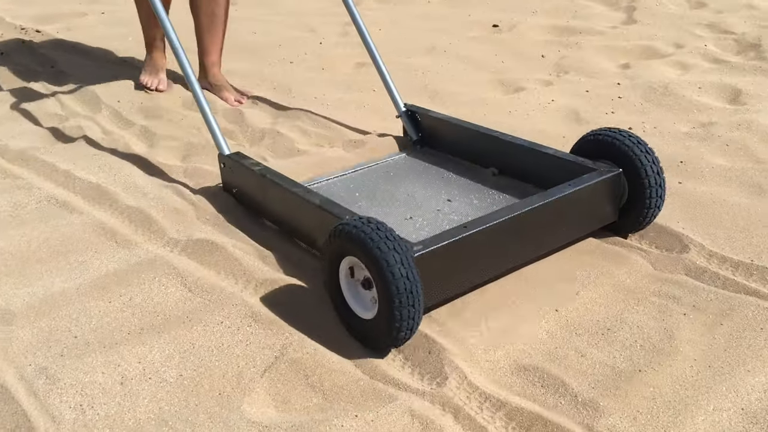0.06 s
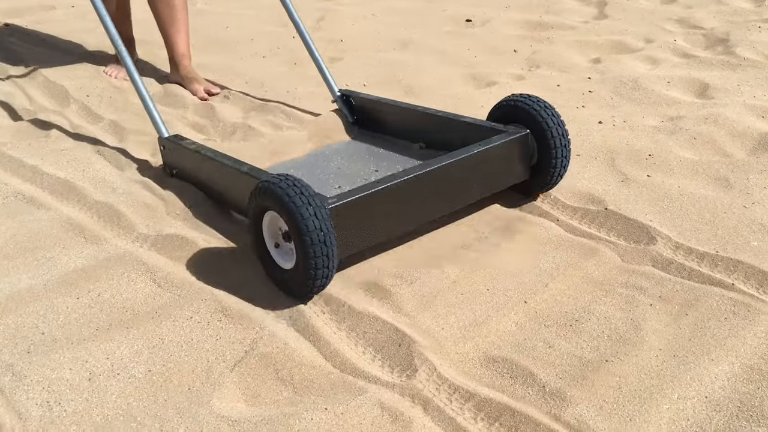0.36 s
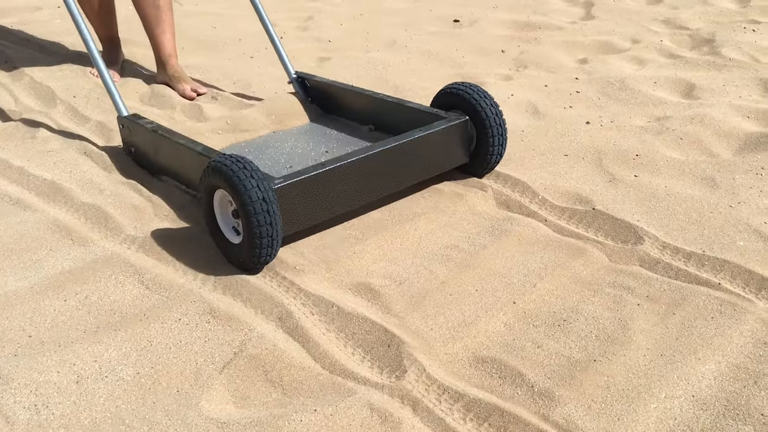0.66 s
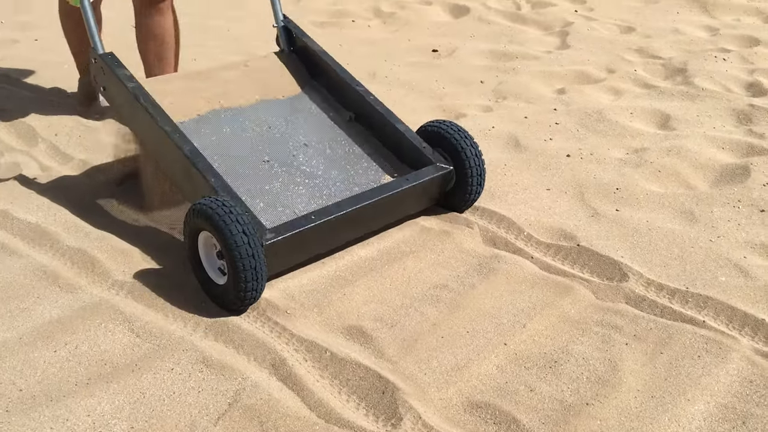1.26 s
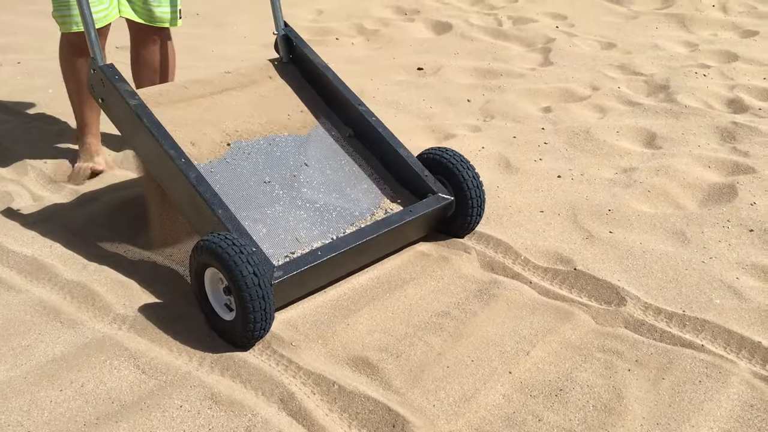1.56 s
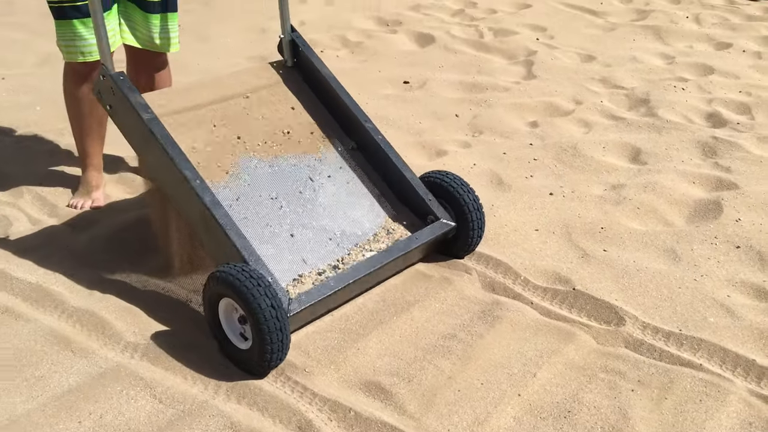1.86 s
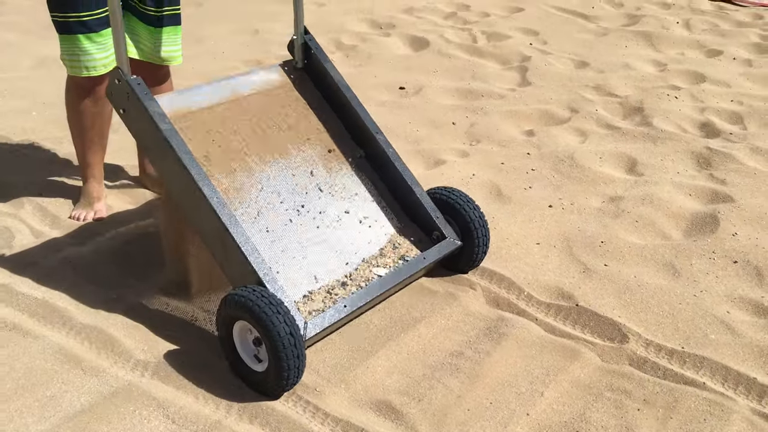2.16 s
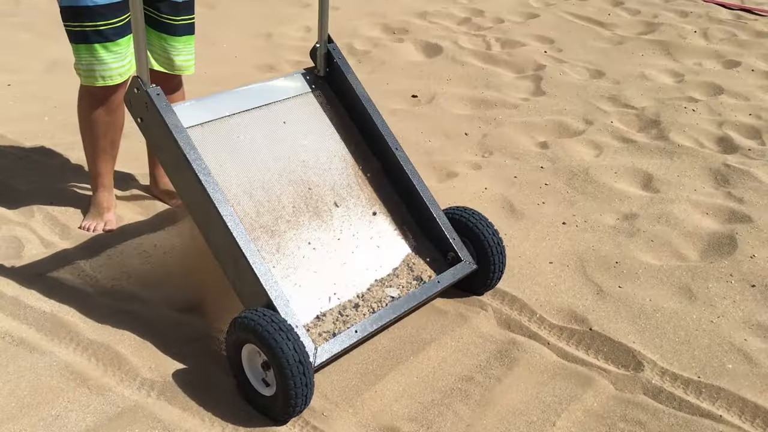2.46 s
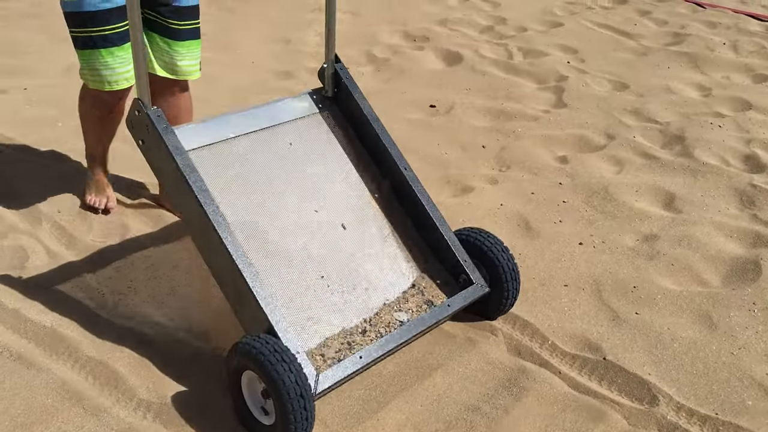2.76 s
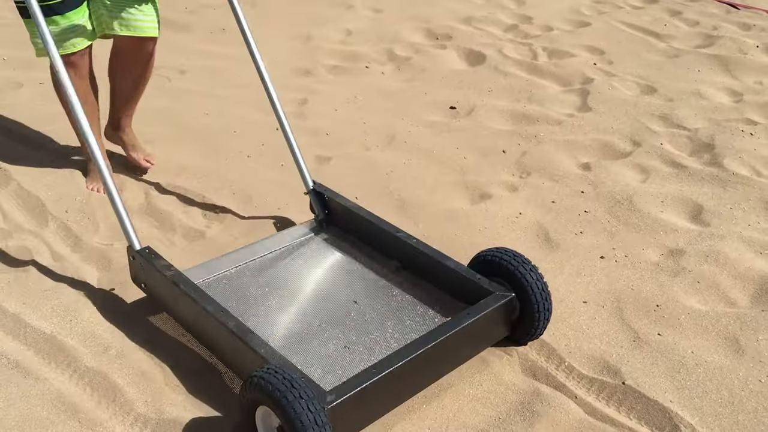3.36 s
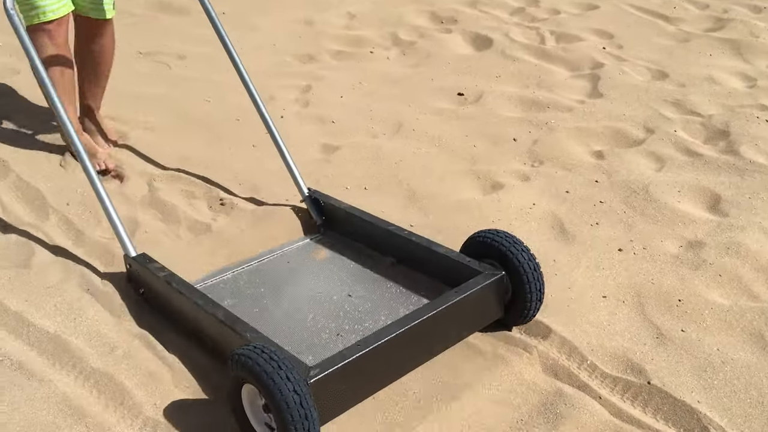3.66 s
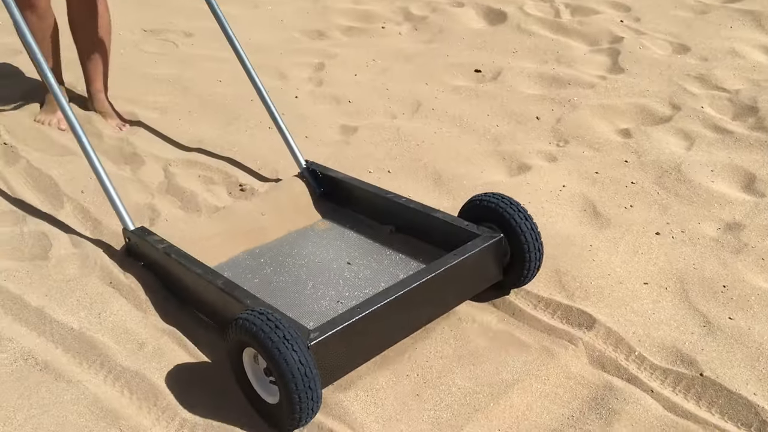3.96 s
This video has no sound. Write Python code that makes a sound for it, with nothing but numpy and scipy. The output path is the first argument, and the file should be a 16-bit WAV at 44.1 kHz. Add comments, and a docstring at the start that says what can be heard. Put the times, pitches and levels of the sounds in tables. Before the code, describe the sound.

A metal sieve scrapes through sand and tips, sifting sand and rattling pebbles, with wind behind.

```python
"""A wheeled metal sieve is dragged through beach sand, tipped up and set down again. Wind, far surf and a low
drone lie behind it all. First sand hisses under the scoop and the handle clacks; the blade crunches and a dull
low thump sounds. From about 1.1 s sand sifts through the tilted mesh, and soon pebbles tick down it. Near 3 s a
far wave breaks; then more low thumps sound, the handle clacks again and the blade crunches back in."""
import sys
import numpy as np
from scipy import signal
from scipy.fft import rfft, irfft
from scipy.io import wavfile

SR = 44100
rng = np.random.default_rng(int(sys.argv[2]) if len(sys.argv) > 2 else 0)


def dump(signal):
    """Clip the signal to [-1, 1] and save it as 16-bit WAV at the path in sys.argv[1]."""
    limited = np.clip(np.atleast_2d(signal).T, -1, 1)
    pcm = np.round(limited * 32767).astype(np.int16)
    wavfile.write(sys.argv[1], SR, pcm)


N = 176400
T, HZ = np.arange(N) / SR, np.fft.rfftfreq(N, 1 / SR)
SAND_PER_S = 9000  # grain impacts each second


def amp(db):
    """Turns decibels into a gain; amp(-60 * t / t60) fades by 60 dB in t60 seconds."""
    return 10 ** (np.asarray(db) / 20)


def unit(x):
    """Scales a signal to an average (rms) strength of 1."""
    return x / np.sqrt(np.mean(x ** 2) + 1e-20)


def level(points, column=1):
    """Turns a loudness curve into a gain for every sample."""
    rows = np.array(points)
    return amp(np.interp(T, rows[:, 0], rows[:, column]))


def tone_db(points, hz=HZ):
    """Joins the points of a tone curve, giving dB at every frequency."""
    freqs, db = np.transpose(points)
    return np.interp(np.log(hz + 1), np.log(freqs + 1), db)


def colour(x, db):
    """Makes each frequency louder or softer by the given dB."""
    cepstrum = irfft(np.maximum(db, -100) * np.log(10) / 20)
    half = len(cepstrum) // 2
    # folding onto the first half makes the filter ring after a hit, not before
    cepstrum[1:half] *= 2
    cepstrum[half + 1:] = 0
    return irfft(rfft(x) * np.exp(rfft(cepstrum)))


def add(mix, start_s, sound):
    """Places a sound at a time."""
    part = mix[max(round(start_s * SR), 0):][:len(sound)]
    part += sound[:len(part)]


def drift(rate_hz):
    """A slow random wobble of strength 1."""
    slow_only = (HZ > 0) / (1 + (HZ / rate_hz) ** 4)
    return unit(irfft(rfft(rng.standard_normal(N)) * slow_only, N))


def grains(per_s, spread_db, size=N):
    """Tiny random impacts of uneven strength."""
    strength = amp(spread_db * np.minimum(rng.exponential(1, size), 4))
    return unit(strength * rng.choice([-1, 1], size) * (rng.random(size) < per_s / SR))


def mesh_db(hz):
    """How strongly the mesh answers at each frequency."""
    # overall tone of the mesh (frequency [Hz], level [dB])
    tone = [(200, -18), (700, -2.5), (1300, 0), (2100, 1), (2700, -1.5), (3400, 3), (4900, 1), (5900, 5),
            (6600, 2), (7200, -3), (8600, 0.5), (9900, -2.5), (10500, -4.5), (11200, -6), (13000, -7)]
    # where the mesh rings (frequency [Hz], width [Hz], boost [dB])
    peaks = [(1636, 77, 8), (2940, 150, 1.5), (9400, 200, 3.5), (10000, 120, 4), (11150, 230, 7.5),
             (11830, 330, 7)]
    return tone_db(tone, hz) + sum(db / (1 + (2 * (hz - f) / width) ** 2) for f, width, db in peaks)


def shape_hit(hit, bands_db, ping_hz, ping_db, ping_width_hz):
    """Gives a hit its ping and its strength in the low, middle and high band."""
    # the three bands (lower edge [Hz], upper edge [Hz])
    edges = [(1000, 3000), (3000, 8000), (8000, 16000)]
    # where each band's gain is set (frequency [Hz])
    centres = [1700, 5000, 11000]
    hz = np.fft.rfftfreq(len(hit), 1 / SR)
    hit = colour(hit, ping_db / (1 + (2 * (hz - ping_hz) / ping_width_hz) ** 2))
    power = abs(rfft(hit)) ** 2 * 2 / len(hit) / (.02 * SR)  # energy spread over 20 ms
    now_db = [10 * np.log10(power[(hz > lo) & (hz < hi)].sum()) for lo, hi in edges]
    change = list(zip(centres, np.array(bands_db) - now_db))
    return colour(hit, tone_db(change, hz))


def wind():
    """Wind rumbles in uneven gusts."""
    # wind strength (time [s], level [dB])
    loudness = [(0.0, -46), (0.63, -43), (0.67, -39.5), (0.96, -39), (0.99, -48), (1.26, -38), (1.35, -57),
                (1.46, -38), (1.98, -41.5), (2.03, -50), (2.18, -42), (2.26, -52.5), (2.45, -41),
                (2.97, -49), (3.0, -42.5), (3.27, -39.5), (3.31, -35), (3.58, -41), (3.88, -37.5),
                (4.0, -40.5)]
    # deep rumble (frequency [Hz], level [dB])
    tone = [(15, -38), (30, -21), (45, -3), (60, -0.5), (100, -3), (150, -8.5), (220, -20), (400, -30),
            (1000, -62.5)]
    rumble = colour(rng.standard_normal(N), tone_db(tone))
    return level(loudness) * unit(rumble * amp(1.4 * drift(rate_hz=11.0)))


def surf(level_db=-45.5):
    """Far surf makes a steady wash that wavers slightly."""
    # dull wash (frequency [Hz], level [dB])
    tone = [(40, -24), (110, -6), (185, -0.5), (260, -7), (400, -13.5), (500, -19.5), (640, -19),
            (800, -22), (1200, -24.5), (2500, -34), (6200, -41), (7800, -44), (9300, -42), (10500, -50),
            (11700, -52), (14000, -56)]
    wash = unit(colour(rng.standard_normal(N), tone_db(tone)))
    return amp(level_db) * wash * amp(0.5 * drift(rate_hz=13))


def drone(pitch_hz=192.2, width_hz=32.5, wander_hz=5.08):
    """A faint, narrow band of rumble wanders in pitch and strength."""
    # the drone coming and going (time [s], level [dB])
    loudness = [(0, -48.5), (.55, -44.5), (.8, -50.5), (1.2, -46.5), (2, -46), (2.3, -56.5), (2.6, -54.5),
                (4, -61.5)]
    phase = 2 * np.pi * np.cumsum(pitch_hz + wander_hz * drift(rate_hz=4.15)) / SR
    hum = drift(width_hz / 2) * np.sin(phase) + drift(width_hz / 2) * np.cos(phase)
    return level(loudness) * unit(hum)


def drag(squeal_hz=6540, squeal_width_hz=1100):
    """Sand rubs under the scoop and makes its sheet metal ring at one high pitch."""
    # the scoop sliding on sand (time [s], level [dB])
    rub_loudness = [(0, -57.5), (.05, -58.5), (.12, -48.5), (.2, -51), (.33, -53), (.5, -55.5),
                    (.66, -56.5), (.8, -65.5), (3.45, -65), (3.6, -55), (3.71, -52.5), (3.82, -53.5),
                    (4, -55)]
    # hiss of the rubbing (frequency [Hz], level [dB])
    rub_tone = [(150, -20), (500, 7), (1500, 8), (2800, 1), (3600, 4.5), (4300, 4), (4900, -0.5),
                (5500, 5.5), (6500, 2.5), (7700, -4.5), (9000, -4), (10500, -13), (11900, -6.5),
                (16000, -18)]
    # the metal ringing (time [s], level [dB])
    squeal_loudness = [(0, -85), (.11, -70), (.18, -59), (.33, -59.5), (.47, -64), (.8, -83)]
    rub = grains(SAND_PER_S, spread_db=2.5) * amp(0.49 * drift(rate_hz=40))
    hiss = unit(colour(rub, tone_db(rub_tone)))
    peak_db = -20 * np.log10(1 + (2 * (HZ - squeal_hz) / squeal_width_hz) ** 2)
    squeal = unit(colour(grains(SAND_PER_S, spread_db=2), peak_db))
    return level(rub_loudness) * hiss + level(squeal_loudness) * squeal


def clacks(rise_s=0.00057, t60=0.059, contact_s=0.0015, contact_width_s=0.0011, delay_s=.0004):
    """The handle's metal joints knock, chatter and briefly ring the sand-damped frame."""
    # knocks (time [s], low [dB], middle [dB], high [dB], ping [Hz], ring [dB], crack [dB])
    knocks = [(0.023, -52.5, -58, -87, 2500, -3, 0), (0.0941, -41.5, -38.5, -49.5, 3670, -12, -2),
              (.127, -49, -61, -71, 1600, -6, 2), (3.4961, -43, -60, -69, 1750, -7, -6),
              (3.5387, -57, -55, -65, 6500, -7, -4), (3.5654, -41.5, -33, -48.5, 6640, 1, -3)]
    # ringing notes of frame and handle (frequency [Hz], level [dB], time to fade 60 dB [s])
    notes = [(1657, -11, 0.055), (2533, -6, 0.05), (3150, 5.5, 0.02), (3917, 9, 0.042), (4430, -3, 0.023),
             (5240, 6.5, 0.062), (5670, 3, .035), (5860, 3, 0.054), (6170, 4, .04), (6960, 8, 0.022),
             (7700, -4, 0.036)]
    # tone of the crack (frequency [Hz], level [dB])
    tone = [(200, -26), (750, -9), (1500, -13.5), (2900, -4.5), (3700, 4), (4900, 4), (7200, 13.5),
            (8800, 8.5), (10200, -3), (11500, 2.5), (16000, -2)]
    out, t = np.zeros(N), T[:8192]
    body_db = tone_db(tone, np.fft.rfftfreq(len(t), 1 / SR))
    contact = np.exp(-((t - contact_s) / contact_width_s) ** 2)
    for start_s, *bands_db, ping_hz, ring_db, crack_db in knocks:
        ring = sum(amp(db - 60 * t / fade_s) * np.sin(2 * np.pi * (hz * t + rng.random()))
                   for hz, db, fade_s in notes)
        envelope = amp(-60 * t / t60) + amp(crack_db) * contact
        crack = colour(rng.standard_normal(len(t)) * envelope, body_db)
        hit = np.minimum(t / rise_s, 1) * (unit(crack) + amp(ring_db) * unit(ring))
        add(out, start_s + delay_s, shape_hit(hit, bands_db, ping_hz, ping_db=3.0, ping_width_hz=550))
    return out


def bites(rise_s=0.0034):
    """Packed grains crunch against the blade as it bites into the sand."""
    # bites (time [s], hold [s], time to fade 60 dB [s], level [dB], treble tilt [dB per octave])
    cuts = [(0.666, 0.02, 0.048, -44, 1.5), (0.956, .004, .03, -55.5, 3), (3.621, 0.013, .04, -48.5, -6.5),
            (3.659, 0.01, 0.098, -36, -0.5), (3.675, 0.0045, .03, -34, 0), (3.683, 0.012, 0.16, -41, -4)]
    # tone of the crunch (frequency [Hz], level [dB])
    tone = [(150, -30), (400, -2), (1000, -7), (2300, -3), (4300, -3), (6200, -1), (7700, -9), (9200, -9),
            (11000, -19), (13500, -15.5)]
    out, t = np.zeros(N), T[:16384]
    hz = np.fft.rfftfreq(len(t), 1 / SR)
    for start_s, hold_s, t60, db, tilt in cuts:
        tilted_db = tone_db(tone, hz) + tilt * np.log2(np.maximum(hz, 700) / 4000)
        crunch = unit(colour(grains(per_s=20000, spread_db=2.5, size=len(t)), tilted_db))
        envelope = np.minimum(t / rise_s, 1) * amp(db - 60 * np.maximum(t - hold_s, 0) / t60)
        add(out, start_s, crunch * envelope)
    return out


def thumps(rise_s=0.0026):
    """Dull low thumps boom now and then, like gusts buffeting."""
    # thumps (time [s], level [dB], pitch [Hz], time to fade 60 dB [s])
    bumps = [(0.674, -24, 89, 0.068), (1.238, -34, 71, 0.15), (3.303, -27.5, 61, .18),
             (3.371, -25.5, 58, 0.27), (3.437, -29.5, 57.6, 0.11)]
    out, t = np.zeros(N), T[:16384]
    for start_s, db, hz, t60 in bumps:
        envelope = np.minimum(t / rise_s, 1) * amp(db - 60 * t / t60)
        add(out, start_s, envelope * np.sin(2 * np.pi * hz * t))
    return out


def sifting(grit_per_s=900, streams=6, buzz_t60=0.018):
    """Coarse grit hops down the tilted mesh while fine sand fizzes through it."""
    # sand on the mesh (time [s], fine sand [dB], coarse grit [dB])
    loudness = [(0, -86, -90), (1.08, -81, -77), (1.25, -70, -70.5), (1.6, -64, -63.5), (1.9, -66, -53.5),
                (2.2, -66, -47), (2.4, -56, -46), (2.6, -56, -50.5), (2.8, -61, -53.5), (3.0, -62, -63.5),
                (3.25, -80, -69.5), (4, -82, -90)]
    # fizz of fine sand (frequency [Hz], level [dB])
    fine_tone = [(500, -27), (3000, 6), (7500, -3), (9300, -13.5), (10500, 2), (12000, 2.5), (14200, 6)]
    hops, t = np.zeros(N), T[:2048]
    for _ in range(streams):
        impacts = grains(grit_per_s / streams, spread_db=1.0)
        buzz = rng.standard_normal(len(t)) * amp(-60 * t / buzz_t60)
        hops += signal.oaconvolve(impacts, buzz)[:N]  # one buzz for each impact
    grit = unit(colour(hops, mesh_db(HZ)))
    fine = unit(colour(grains(SAND_PER_S, spread_db=4.0), tone_db(fine_tone)))
    return level(loudness, column=2) * grit + level(loudness, column=1) * fine


def pour():
    """Sand pours off the mesh and lands on the ground."""
    # the falling stream (time [s], level [dB])
    loudness = [(0, -78), (1.1, -57), (1.38, -52), (1.55, -47.5), (1.75, -41.5), (1.95, -42.5),
                (2.15, -46.5), (2.4, -63), (2.8, -83)]
    # dull patter (frequency [Hz], level [dB])
    tone = [(40, -12.5), (90, 17.5), (150, 21.5), (200, 18.5), (290, 3), (560, 4), (800, -11.5), (1800, -9),
            (2600, -16), (6000, -29), (13000, -52)]
    return level(loudness) * unit(colour(grains(SAND_PER_S, spread_db=2), tone_db(tone)))


def sizzle():
    """The finest grains run through the mesh as soon as it tilts."""
    # flow of the finest sand (time [s], level [dB])
    loudness = [(0, -95), (1.13, -90), (1.22, -71.5), (1.6, -69), (2.0, -65), (2.9, -66), (3.15, -85),
                (3.65, -83), (3.8, -72), (4, -71)]
    # very high hiss (frequency [Hz], level [dB])
    tone = [(5000, -35), (8800, -8), (10500, -14), (12000, -8), (13200, -8), (15300, 0)]
    return level(loudness) * unit(colour(grains(SAND_PER_S, spread_db=2), tone_db(tone)))


def pings(pitches_hz=(2780, 3110, 3240, 3460), t60=0.012, per_pitch_per_s=160):
    """Small grains ring the mesh briefly and brightly while sand still weighs on it."""
    # the pinging (time [s], level [dB])
    loudness = [(0, -92), (1.1, -86), (1.45, -65.5), (1.75, -62.5), (1.95, -60), (2.6, -73)]
    rings, t = np.zeros(N), T[:4096]
    for hz in pitches_hz:
        ring = amp(-60 * t / t60) * np.sin(2 * np.pi * hz * t)
        rings += signal.oaconvolve(grains(per_pitch_per_s, spread_db=4.0), ring)[:N]
    return level(loudness) * unit(rings)


def pebbles(rise_s=0.0005, hold_s=0.0031, t60=0.029, tail_db=-24, tail_t60=0.1, tick_db=5,
            tick_t60=.003, bounce_s=.0028, bounce_db=-3, gain_db=-2.0, delay_s=.0005):
    """Each pebble or bit of shell ticks, bounces once and makes the tight mesh buzz briefly."""
    # strikes before gain_db (time [s], low [dB], middle [dB], high [dB], ping [Hz], ping boost [dB])
    strikes = [(1.639, -55, -55.5, -67, 3600, 8), (1.7162, -57, -56, -74, 3320, 16),
               (1.7372, -55, -50.5, -61, 3270, 14), (1.7878, -54.5, -50, -61, 3100, 10),
               (1.795, -59, -56, -70, 3380, 13), (1.8225, -56, -53.5, -62, 3000, 9),
               (1.8595, -44, -54, -62, 2820, 14), (1.973, -50, -51, -68, 1880, 0),
               (2.015, -50.5, -52, -60, 3420, 4), (2.0556, -56, -48, -55, 6000, 8),
               (2.081, -49, -48, -58, 5500, 7), (2.132, -47, -58, -64, 2290, 10),
               (2.1509, -44, -34, -40.5, 5600, 4), (2.177, -58, -49, -55, 5800, 4),
               (2.1865, -51, -47, -58, 3500, 7), (2.1965, -47, -44, -54, 1610, 5),
               (2.2336, -53, -43.5, -51, 5940, 2), (2.291, -44, -40.5, -57, 5400, 11),
               (2.3686, -51, -45.5, -49, 5950, 6), (2.4845, -49, -49.5, -42, 9400, 9),
               (2.496, -48.5, -67, -60, 1850, 10), (2.5128, -54, -54, -43, 9400, 3),
               (2.5308, -46, -39, -43, 5760, 0), (2.5793, -49, -43.5, -39, 9350, 7),
               (2.603, -50, -49, -50, 5960, -2), (2.616, -48, -43.5, -50, 3220, 7),
               (2.6267, -54, -49, -44.5, 9400, 8), (2.7022, -48.5, -46.5, -42.5, 9500, 14),
               (2.7228, -56, -48.5, -45, 9400, 3), (2.742, -61, -54, -51, 9400, 3),
               (2.7717, -59, -51, -56, 6000, 0), (2.7995, -57, -53, -47.5, 9400, 4),
               (2.943, -74, -74, -62, 12000, 5)]
    out, t = np.zeros(N), T[:8192]
    body_db = mesh_db(np.fft.rfftfreq(len(t), 1 / SR))
    fade = amp(-60 * np.maximum(t - hold_s, 0) / t60)
    tail = amp(tail_db - 60 * t / tail_t60)
    ring = np.minimum(t / rise_s, 1) * (fade + tail)
    tick = amp(tick_db - 60 * t / tick_t60)
    for start_s, *bands_db, ping_hz, ping_db in strikes:
        envelope = ring + tick
        add(envelope, bounce_s * (.5 + rng.random()), amp(bounce_db) * tick)
        buzz = colour(envelope * rng.standard_normal(len(t)), body_db)
        add(out, start_s + delay_s, shape_hit(buzz, bands_db, ping_hz, ping_db, ping_width_hz=710))
    return amp(gain_db) * out


def wave():
    """A far wave, faint at first, swells and breaks near 3 s."""
    # the swell (time [s], level [dB])
    loudness = [(0, -68), (1, -59), (2.8, -71), (3.02, -52), (3.25, -55), (3.42, -57.5), (3.6, -53.5),
                (4, -54.5)]
    # soft roar (frequency [Hz], level [dB])
    tone = [(150, -4), (350, -1.5), (550, 3), (800, -4.5), (1250, -4), (2000, -12), (4000, -24),
            (12000, -55)]
    return level(loudness) * unit(colour(rng.standard_normal(N), tone_db(tone)))


def scene():
    """Mixes the open beach and the sieve into one channel."""
    beach = wind() + surf() + drone() + wave()
    sieve = thumps() + drag() + sifting() + pour() + pings() + pebbles() + clacks() + bites() + sizzle()
    return (beach + sieve)[None]


def record(dry):
    """Cuts away the very highest treble."""
    cutoff_hz = 15830
    low_pass = signal.firwin(511, cutoff_hz, window=("kaiser", 9), fs=SR)
    return signal.oaconvolve(dry, low_pass[None], "same")


dry = scene()
out = record(dry)
dump(out)
```